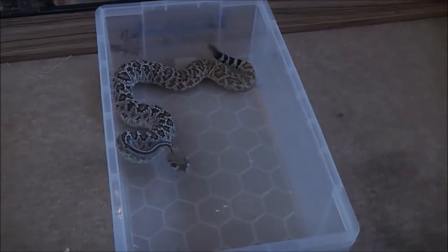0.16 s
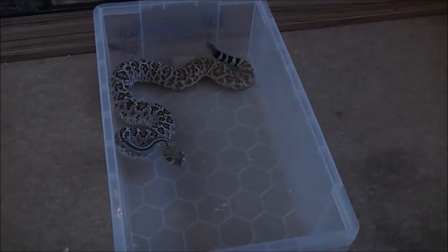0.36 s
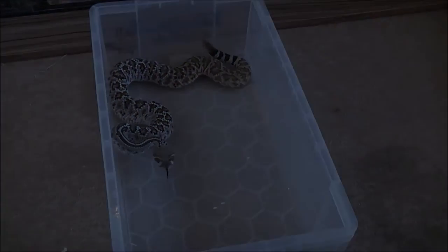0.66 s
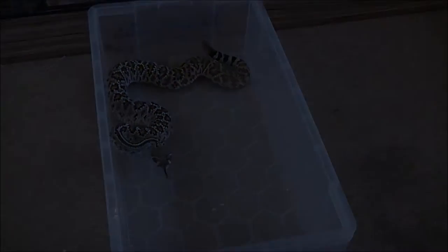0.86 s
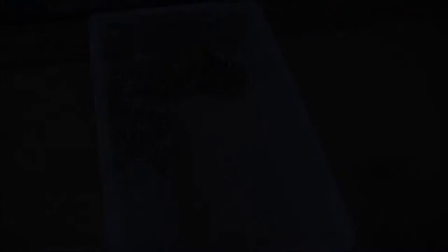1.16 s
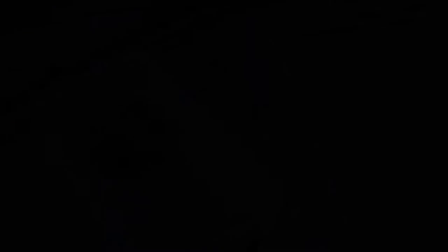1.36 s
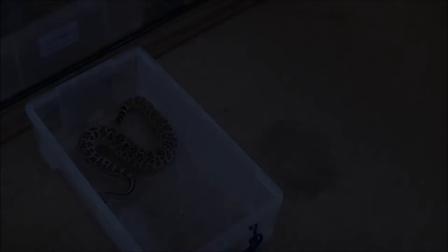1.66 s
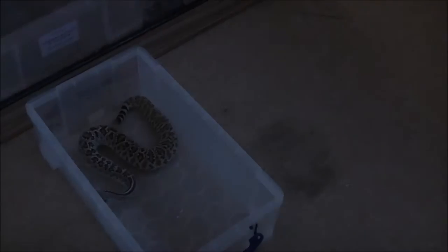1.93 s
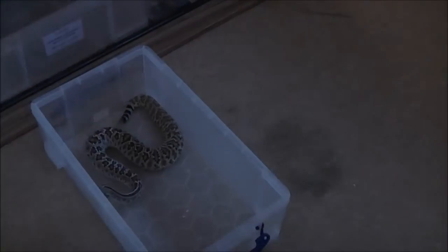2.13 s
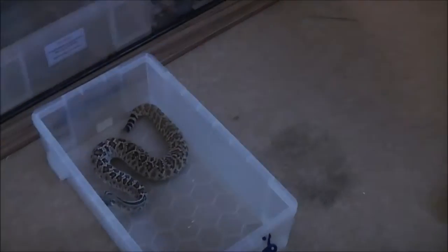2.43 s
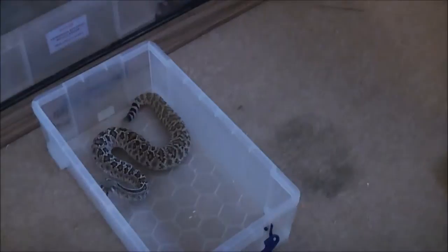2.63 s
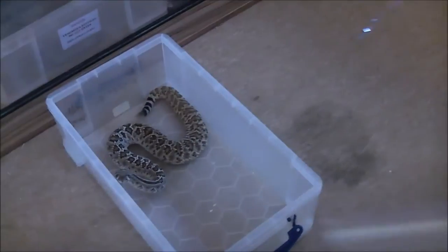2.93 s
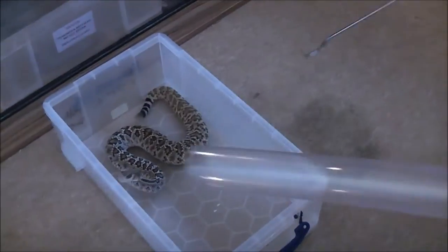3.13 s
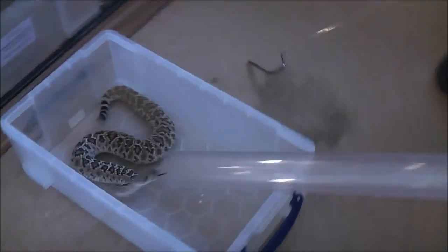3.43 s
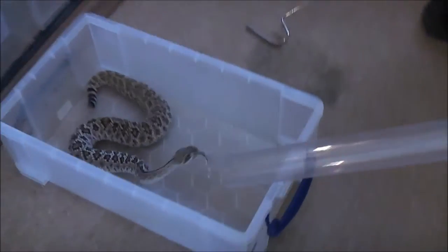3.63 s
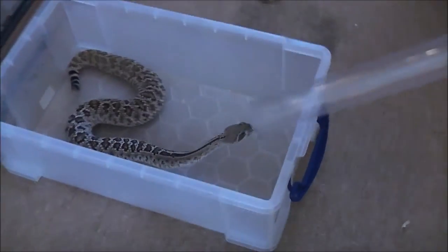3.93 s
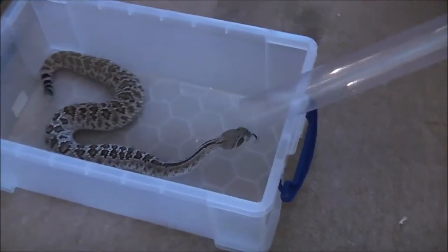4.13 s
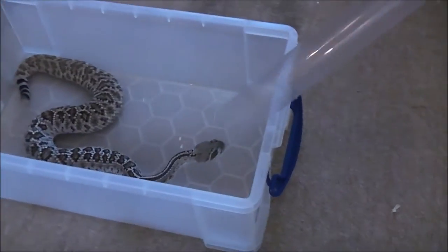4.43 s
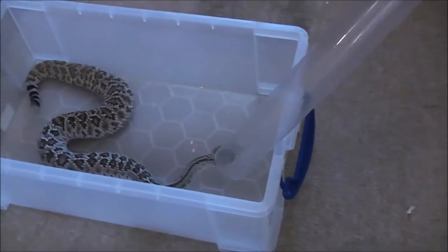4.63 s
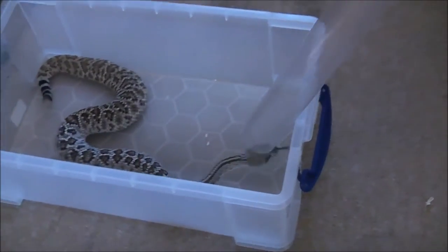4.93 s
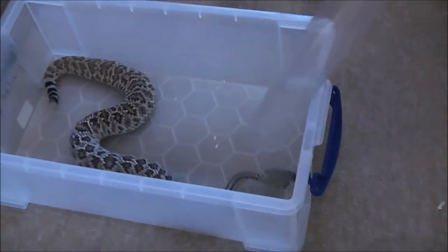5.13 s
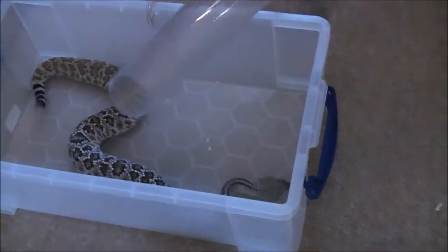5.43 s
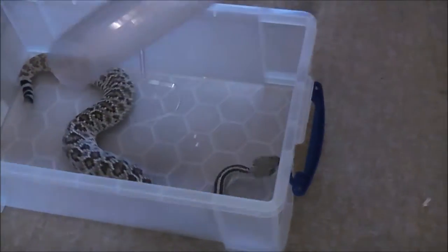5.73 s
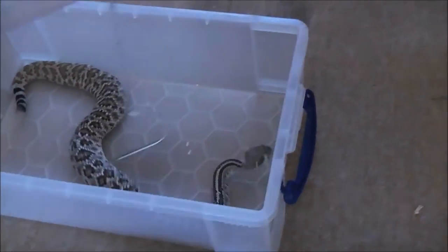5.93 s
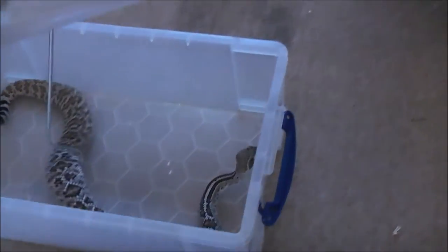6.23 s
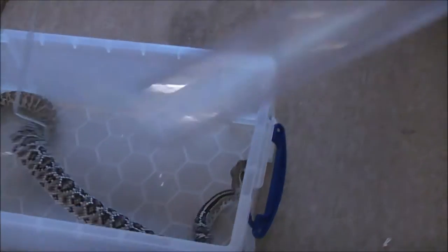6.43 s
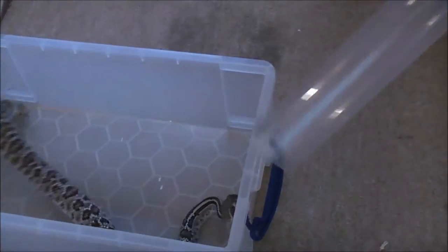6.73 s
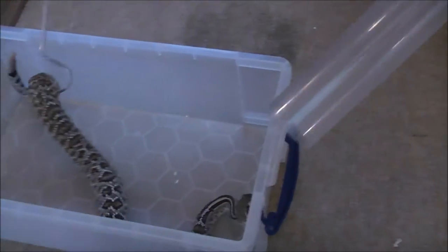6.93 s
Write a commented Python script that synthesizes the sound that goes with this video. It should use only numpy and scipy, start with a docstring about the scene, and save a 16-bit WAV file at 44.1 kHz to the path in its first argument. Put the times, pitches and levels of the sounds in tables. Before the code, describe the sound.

Dry, high rattlesnake rattling in a small room breaks off for half a second, then resumes as a tube bumps the plastic tub.

```python
"""In a small room, a rattlesnake buzzes its tail inside a plastic tub.
About 115 times a second the loose horn segments collide, and their impacts excite the hollow shells;
the timbre shifts with the snake's pose. At first the tail also patters on the tub. The sound breaks off
for half a second, then the buzz returns. A handler's plastic tube rubs and knocks against the walls,
hardest near the end, and rings the modes of the tub over faint room noise."""
import sys
import numpy as np
from scipy import signal
from scipy.fft import rfft, irfft, next_fast_len
from scipy.io import wavfile
from scipy.ndimage import uniform_filter1d

SR = 44100
rng = np.random.default_rng(int(sys.argv[2]) if len(sys.argv) > 2 else 0)


def int16_out(signal):
    """Quantize to a 16-bit WAV file."""
    q = np.round(np.clip(np.atleast_2d(signal).T, -1, 1) * 32767)
    wavfile.write(sys.argv[1], SR, q.astype(np.int16))


N = 312228

# Spectral envelope of the rattle in each pose. Each row: frequency in Hz, relative level in dB.
STRETCHED_SPECTRUM = [(150, -39.5), (600, -36.5), (1500, -29.5), (2400, -22.5), (3050, -11.5), (3550, -1),
                      (4800, -1.5), (6300, -7), (8500, -5), (10800, -9), (13000, -16), (15500, -21.5)]
COILED_SPECTRUM = [(150, -34.5), (500, -32.5), (1150, -31), (1400, -25.5), (2600, -19.5), (3000, -14.5),
                   (4000, -3), (5800, -1), (7200, -7), (8200, -5), (10200, -11), (12600, -8.5),
                   (15500, -20.5)]
CRAWLING_SPECTRUM = [(150, -32), (500, -32.5), (1150, -26), (1400, -24), (2650, -17), (3300, -8),
                     (4700, 1.5), (5700, -1.5), (6500, 1), (7400, -3), (9500, -5.5), (13000, -7),
                     (15500, -16)]
FLEEING_SPECTRUM = [(150, -32.5), (600, -29.5), (1500, -32), (2400, -22), (3050, -3.5), (4200, -3.5),
                    (4900, 1.5), (6000, -5), (8200, -8), (9500, -10), (12000, -11), (15500, -21)]
# Resonances of the shells and tub corner in each pose. Each row: centre in Hz, width in Hz, gain in dB.
STRETCHED_RESONANCES = [(3500, 110, -3), (4360, 41, 6)]
COILED_RESONANCES = [(1330, 45, 6.9), (1640, 25, 8.9), (2964, 130, 9), (3520, 150, 3.5), (3990, 61, 3.7),
                     (8320, 310, 3.8)]
CRAWLING_RESONANCES = [(1375, 41, 4.2), (2140, 105, 4.5), (2920, 110, 5.9), (3290, 37, 1.12),
                       (3760, 250, 3.6), (6200, 230, 1.2), (8110, 300, 3.6)]
FLEEING_RESONANCES = [(3580, 110, 3), (4800, 86, 2), (8200, 300, 2.4)]
# Passages from one pose to the next. Each row: midpoint in seconds, duration in seconds.
POSE_CHANGES = [(1.6, .2), (3.804, 0.65), (6.46, .3)]


def rattle():
    """Source and filter: impacts excite hollow horn; each pose aims other resonances at the listener."""
    t = np.arange(N) / SR
    crisp = clashes(spread_strokes=.145, return_db=-7, scatter_db=1.1)
    loose = clashes(spread_strokes=.16, return_db=-5, scatter_db=.7)
    pose = sum(np.clip((t - s) / duration + .5, 0, 1) for s, duration in POSE_CHANGES)
    drive = np.where(pose < .5, crisp, loose)
    # slowly changing echoes from the nearest walls comb-filter the buzz
    drive = moving_echoes(drive, tub_db=-.5, tub_t60=.079, room_db=-3, positions=12).mean(0)
    drive = diffuse_field(drive, tub_db=-8, tub_t60=.03, room_db=-4, room_t60=.3)
    poses = [(STRETCHED_SPECTRUM, STRETCHED_RESONANCES), (COILED_SPECTRUM, COILED_RESONANCES),
             (CRAWLING_SPECTRUM, CRAWLING_RESONANCES), (FLEEING_SPECTRUM, FLEEING_RESONANCES)]
    buzz = np.zeros((2, N))
    for k, (spectrum, resonances) in enumerate(poses):
        def horn_gain(hz):
            peaks_db = sum(db / (1 + (2 * (hz - centre) / width) ** 2) for centre, width, db in resonances)
            return amp(along(spectrum, hz) + peaks_db)
        share = np.clip(1 - abs(pose - k), 0, 1)
        buzz += share * unit(filtered(drive, horn_gain))
    buzz = band(buzz, low_hz=131, high_hz=19840)  # the small shells radiate no bass
    power = abs(uniform_filter1d(buzz.mean(0) ** 2, size=SR // 8))
    even_buzz = buzz / np.sqrt(power + 1e-9)  # the tail muscles keep up an even effort
    balance_db = np.array([[.28], [-.28]])
    return even_buzz * amp(buzz_level_db() + balance_db)


# Tail shake, quicker once the tube comes close. Each row: time in seconds, strokes per second.
STROKE_RATE = [(0, 112), (1.3, 111.5), (2.3, 118), (3.3, 116), (4.1, 114), (4.7, 109), (5.5, 118),
               (5.9, 128), (6.5, 123)]


def clashes(spread_strokes, return_db, scatter_db, click_range_db=8, click_t60=.0042, count=24):
    """A quasi-periodic impact train: in each stroke the segments clash hard going out, softly back."""
    t = np.arange(N) / SR
    cycles = np.cumsum(curve(STROKE_RATE)) / SR
    strokes = np.arange(int(cycles[-1]))[:, None, None]
    shape = (len(strokes), 2, count)  # stroke, out or back, impact
    phase = strokes + np.array([[0], [.5]]) + spread_strokes * rng.standard_normal(shape)
    stroke_db = np.array([[0], [return_db]]) + scatter_db * rng.standard_normal(strokes.shape)
    click_db = stroke_db - click_range_db * rng.random(shape)
    starts = (np.interp(phase.ravel() % cycles[-1], cycles, t) * SR).astype(int)
    age = np.arange(SR // 300)
    envelopes = amp(click_db.reshape(-1, 1)) * decay(age / SR, click_t60)
    clicks = rng.standard_normal(envelopes.shape) * envelopes
    return unit(np.bincount((starts[:, None] + age).ravel(), clicks.ravel(), N)[:N])


# Brief swells and dips of the buzz. Each row: midpoint in seconds, half-length in seconds, change in dB.
BUZZ_SWELLS = [(3.285, 0.071, 1), (6.706, 0.19, 0.6), (6.845, 0.025, -4)]


def buzz_level_db(before_db=-24, after_db=-22.7, step_s=1.6):
    """Amplitude envelope: steady, slightly higher after the silence, with brief swells and dips."""
    steady = np.where(np.arange(N) / SR < step_s, before_db, after_db)
    return steady + sum(db * swell(s, half_length) for s, half_length, db in BUZZ_SWELLS)


# Runs of even tail swaying. Each row: start in seconds, end in seconds, relative level in dB.
TAP_RUNS = [(.006, .03, -36), (.059, .24, -38.5), (0.288, .32, -39), (0.343, .58, -35.5),
            (.612, .85, -34.5), (.878, 1.26, -38), (1.276, 1.3, -41)]


def tail_patter(sway_s=.0717, rebound_s=.018, rebound_db=-4, scatter_db=2.5, tap_t60=.013, gain_db=3.5):
    """Damped impacts: the tail flicks the thin plastic every eighth stroke and lands again two later."""
    t = np.arange(SR // 20) / SR
    out = np.zeros(N)
    for start, end, db in TAP_RUNS:
        for s in np.arange(start, end, sway_s):
            for delay, loss_db in [(0, 0), (rebound_s, rebound_db)]:
                tap = band(rng.standard_normal(len(t)) * decay(t, tap_t60), low_hz=559, high_hz=2770)
                tap_db = db + gain_db + loss_db + scatter_db * rng.standard_normal()
                add(out, s + delay, amp(tap_db) * tap / abs(tap).max())
    return moving_echoes(out, tub_db=2, tub_t60=.041, room_db=-8)


# Normal modes of the tub. Each row: frequency in Hz, relative level in dB, 60 dB decay time in seconds.
TUB_MODES = [(87.3, 0.5, 0.23), (164, -7, 0.23), (213.6, 12.5, 0.19), (244.7, 1, 0.18), (340, -17, 0.24),
             (414, 5, 0.34), (544, 14, 0.15), (612, 1, 0.41), (760, -16, 0.25), (872, -1.5, 0.31),
             (970, 9.5, 0.18), (1100, -9.5, 0.26), (1150, -14, 0.22), (1338, -2.5, 0.39),
             (1480, -18.5, .17), (1770, -7, .2), (2130, -19, .25), (2630, -14, 0.12)]
# Spectrum of the contact. Each row: frequency in Hz, relative level in dB.
CONTACT_SPECTRUM = [(40, -54), (85, 0), (400, 8), (1000, 2), (1400, 0.5), (2600, 0), (3500, -33),
                    (8000, -45)]
# Louder clacks sound brighter. Each row: clack level in dB, upper band edge in Hz.
CLACK_BRIGHTNESS = [(-41, 650), (-31, 950), (-20, 1300)]


def tub_knocks(contact_t60=.0017, ring_db=-29, crack_hz=2550, crack_t60=.0028):
    """Modal excitation: each blow has its own mix of thump, body and clack; loud clacks also crack."""
    t = np.arange(SR // 2) / SR
    hz, mode_db, t60 = np.transpose(TUB_MODES)[:, :, None]
    out = np.zeros((2, N))
    for s, thump_db, body_db, clack_db in blows():
        echoes = impulse_response(tub_db=-2.5, tub_t60=.1, room_db=-3)
        contact = coloured(rng.standard_normal(len(t)) * decay(t, contact_t60), CONTACT_SPECTRUM)
        strike = signal.fftconvolve(contact[None] / abs(contact).max(), echoes, axes=1)[:, :len(t)]
        # each mode reaches the two sides slightly out of phase
        phase = rng.random(hz.shape) + .041 * rng.standard_normal((2, *hz.shape))
        envelopes = amp(mode_db + rng.normal(0, .67, hz.shape)) * decay(t, t60)
        modes = envelopes * np.sin(2 * np.pi * (hz * t + phase))
        blow = strike + amp(ring_db) * modes.sum(1)
        top_hz = np.interp(clack_db, *np.transpose(CLACK_BRIGHTNESS))
        thump = band(blow, low_hz=55, high_hz=124)
        body = band(blow, low_hz=174, high_hz=520)
        clack = band(blow, low_hz=726, high_hz=top_hz, order=2)
        for part, db in [(thump, thump_db), (body, body_db), (clack, clack_db)]:
            add(out, s, amp(db) * part / part[:, :SR // 40].std())
        crack_db = -5.5 + 1.9 * (clack_db + 22.5)  # the stiff rim's crack grows faster than the clack
        crack = amp(crack_db) * decay(t, crack_t60) * np.sin(2 * np.pi * crack_hz * t)
        add(out, s, signal.fftconvolve(crack[None], echoes, axes=1))
    return out


# Blows on the tub. Each row: start in seconds, floor thump in dB, body in dB, clack in dB,
# bounce in dB relative to the blow.
KNOCKS = [(0.413, -45.5, -48, -57, -0.5), (0.532, -51, -47.5, -50, -15), (2.54, -58, -50, -49.5, -11),
          (3.002, -54, -51.5, -53, -12), (3.329, -61, -47, -46.5, -7), (3.433, -66, -57, -45.5, -16),
          (4.015, -57, -42, -39, 0), (5.627, -48, -36.5, -28.5, -19), (5.873, -62, -60, -33, -14),
          (6.092, -62, -53.5, -44, 0.5), (6.387, -41, -41.5, -50, -5), (6.847, -41, -25, -22.5, -30)]


def blows(bounce_s=.035):
    """Rebound: whatever strikes the tub falls back on it once."""
    for s, thump_db, body_db, clack_db, bounce_db in KNOCKS:
        yield s, thump_db, body_db, clack_db
        yield s + bounce_s, thump_db + bounce_db, body_db + bounce_db, clack_db + bounce_db


# Plastic sliding on plastic. Each row: midpoint in seconds, half-length in seconds, resonance in Hz,
# bandwidth in Hz, relative level in dB.
RUBS = [(0.554, 0.027, 339, 50, -43.5), (1.074, 0.042, 361, 60, -51), (1.071, .04, 220, 40, -51),
        (2.076, 0.14, 560, 130, -54.5), (3.363, 0.046, 268, 35, -47.5), (5.398, 0.04, 337, 40, -46),
        (5.42, 0.053, 537, 60, -48), (5.501, 0.046, 230, 30, -53), (6.191, 0.088, 450, 300, -51)]


def tube_rubs(gain_db=-1):
    """Friction noise drives a single resonance, so the plastic groans softly."""
    t = np.arange(N) / SR
    out = np.zeros(N)
    for s, half_length, hz, width_hz, db in RUBS:
        times = t[abs(t - s) < 3 * half_length]
        friction = rng.standard_normal(len(times))
        groan = filtered(friction, lambda f: 1 / np.hypot(1, (f - hz * hz / (f + 1)) / width_hz))
        envelope = np.exp(-((times - s) / half_length) ** 2)
        add(out, times[0], amp(db + gain_db) * unit(groan) * envelope)
    return moving_echoes(out, tub_db=-2.5, tub_t60=.07, room_db=-13)


# Reverberation of the room. Each row: frequency in Hz, 60 dB decay time in seconds.
ROOM_DECAY = [(100, 0.18), (700, 0.47), (3000, 0.23), (14000, 0.052)]


def impulse_response(tub_db, tub_t60, room_db):
    """Reflection: direct sound, quick echoes between the tub walls, then the room's reverberation."""
    t = np.arange(SR // 4) / SR
    hz, frame_s, spectra = signal.stft(rng.standard_normal((2, len(t))), SR, nperseg=256)
    spectra = spectra * decay(frame_s, along(ROOM_DECAY, hz)[:, None])
    room = signal.istft(spectra, SR, nperseg=256)[1][:, :len(t)] * (t > .006)
    walls = rng.standard_normal((2, len(t))) * decay(t, tub_t60) * (t > .0008)
    mid, side = (amp(tub_db) * unit(walls) + amp(room_db) * unit(room)) / np.sqrt(len(t))
    mid[0] += 1  # the direct sound arrives from straight ahead
    return stereo(mid / np.linalg.norm(mid), side / np.linalg.norm(side))


# Stereo width of the reflections. Each row: frequency in Hz, gain of the side signal in dB.
SIDE_SPECTRUM = [(100, -19), (400, -15), (900, -9.5), (4000, -10), (5500, -17), (8000, -15.5), (10000, -10),
                 (13000, -20)]


def stereo(mid, side):
    """Sum and difference: a weaker side signal makes left and right differ, which gives width."""
    side = coloured(side, SIDE_SPECTRUM)
    return np.array([mid + side, mid - side])


def moving_echoes(x, tub_db, tub_t60, room_db, positions=14):
    """Changing path lengths: as a source moves, one echo pattern fades into the next."""
    position = np.linspace(0, positions - 1, N)
    out = np.zeros((2, N))
    for k in range(positions):
        near = np.flatnonzero(abs(position - k) < 1)
        piece = x[near] * np.cos(np.pi / 2 * (position[near] - k))
        echoes = impulse_response(tub_db, tub_t60, room_db)
        add(out, near[0] / SR, signal.fftconvolve(piece[None], echoes, axes=1))
    return out


def diffuse_field(x, tub_db, tub_t60, room_db, room_t60):
    """Incoherent echoes add in energy: the tail whips about, so no two clashes echo alike."""
    t = np.arange(SR // 2) / SR
    tub = amp(tub_db) * unit(decay(t, tub_t60))
    room = amp(room_db) * unit(decay(t, room_t60))
    energy = signal.fftconvolve(x ** 2, (tub ** 2 + room ** 2) / len(t))[:N]
    wash = np.sqrt(abs(energy)) * rng.standard_normal((2, N))
    return stereo(unit(x + wash[0]), unit(wash[1]))


# Spectrum of the room noise. Each row: frequency in Hz, relative level in dB.
AIR_SPECTRUM = [(25, -29), (70, 0.5), (130, -9.5), (300, -5.5), (1000, -11.5), (8000, -37.5)]
# The handler's movements. Each row: midpoint in seconds, half-length in seconds, level in dB.
HANDLER_STIRS = [(.75, 0.38, -64), (3, .35, -59.5), (3.833, .22, -62.5), (5.5, .4, -63), (6.65, .4, -64)]


def room_air(still_db=-87.5):
    """Amplitude-modulated noise: a faint low hush swells as the handler moves."""
    level = amp(still_db) + sum(amp(db) * swell(s, half_length) for s, half_length, db in HANDLER_STIRS)
    return level * unit(coloured(rng.standard_normal(N), AIR_SPECTRUM))


def amp(db):
    """Amplitude ratio of a level in decibels."""
    return 10 ** (np.asarray(db) / 20)


def decay(t, t60):
    """Exponential damping: a fall of 60 dB every t60 seconds."""
    return amp(-60 * t / t60)


def swell(s, half_length):
    """Gaussian envelope of height 1 around time s."""
    return np.exp(-((np.arange(N) / SR - s) / half_length) ** 2)


def unit(x):
    """Normalisation to an RMS of 1."""
    return x / np.sqrt(np.mean(x ** 2) + 1e-20)


def along(points, hz):
    """Interpolation of (Hz, value) points on a logarithmic frequency axis."""
    frequencies, values = np.transpose(points)
    return np.interp(np.log(hz + 1), np.log(frequencies), values)


def curve(rows):
    """Linear interpolation of (seconds, value) rows, one value per sample."""
    return np.interp(np.arange(N) / SR, *np.transpose(rows))


def filtered(x, gain):
    """Minimum-phase filter: folding the cepstrum gives a causal response with this gain curve."""
    size = 2 * next_fast_len(x.shape[-1] // 2 + 4096)
    hz = np.fft.rfftfreq(size, 1 / SR)
    cepstrum = irfft(np.log(np.maximum(gain(hz), 1e-6)))
    cepstrum[1:size // 2] *= 2
    cepstrum[size // 2 + 1:] = 0
    return irfft(rfft(x, size) * np.exp(rfft(cepstrum)), size)[..., :x.shape[-1]]


def coloured(x, spectrum):
    """Spectral shaping by (Hz, dB) points."""
    return filtered(x, lambda hz: amp(along(spectrum, hz)))


def band(x, low_hz, high_hz, order=3):
    """Band-pass filter whose skirts fall 6 dB per octave for each order."""
    n = 2 * order
    return filtered(x, lambda hz: ((1 + (low_hz / (hz + 1)) ** n) * (1 + (hz / high_hz) ** n)) ** -.5)


def add(track, s, sound):
    """Superposition of a sound on the track at time s."""
    start = max(round(s * SR), 0)
    track[..., start:start + sound.shape[-1]] += sound[..., :N - start]


def scene():
    """Superposition of the snake, the handling of its tub and the room."""
    return rattle() + tail_patter() + tub_knocks() + tube_rubs() + room_air()


# The silent break. Each row: time in seconds, amplitude gain as a ratio.
BREAK_GAIN = [(1.344, 1), (1.345, .03), (1.375, .005), (1.38, 0), (1.888, 0), (1.898, 1)]


def record(dry, top_hz=15780):
    """Gating and band limiting: the sound breaks off for half a second and lacks the highest treble."""
    size = next_fast_len(N + SR // 4)
    hz = np.fft.rfftfreq(size, 1 / SR)
    passband = np.clip((top_hz - hz) / 100 + .5, 0, 1)
    return irfft(rfft(dry * curve(BREAK_GAIN), size) * passband, size)[:, :N]


dry = scene()
out = record(dry)
int16_out(out)
```